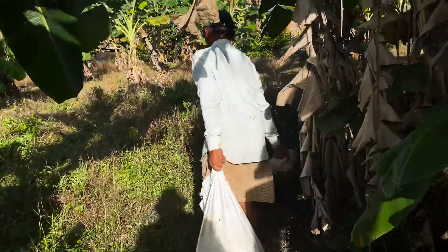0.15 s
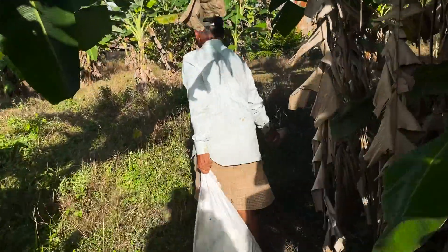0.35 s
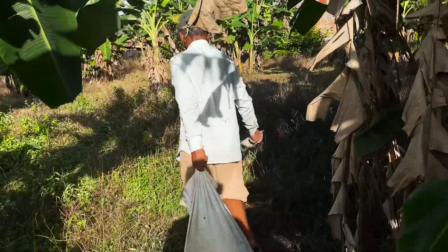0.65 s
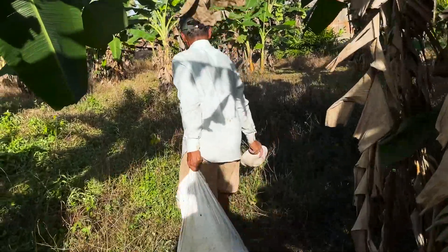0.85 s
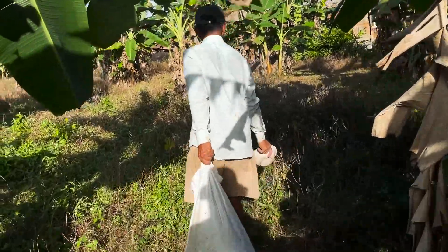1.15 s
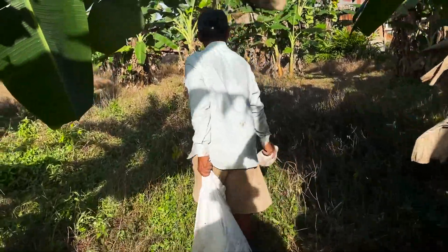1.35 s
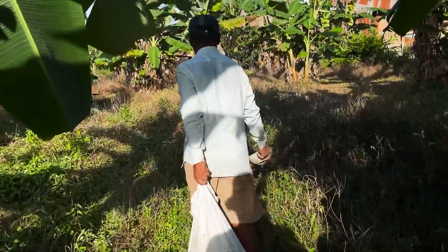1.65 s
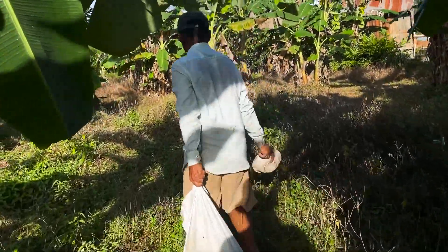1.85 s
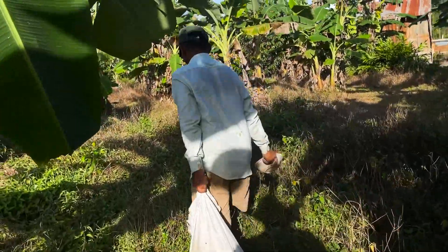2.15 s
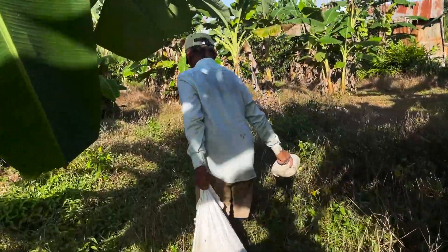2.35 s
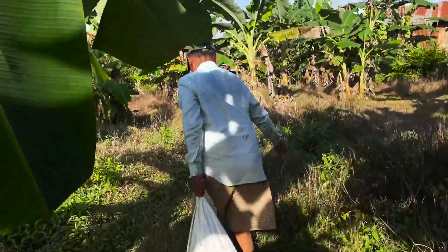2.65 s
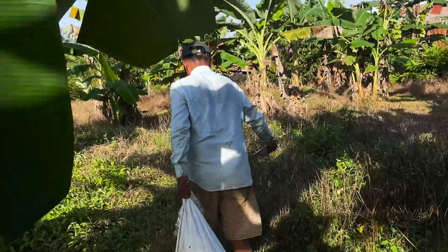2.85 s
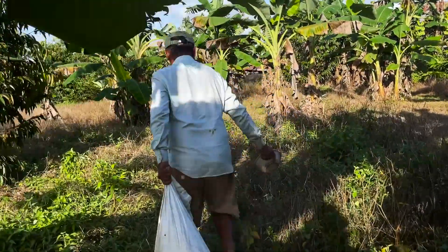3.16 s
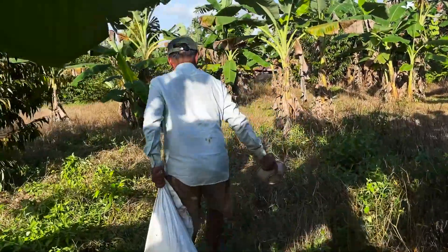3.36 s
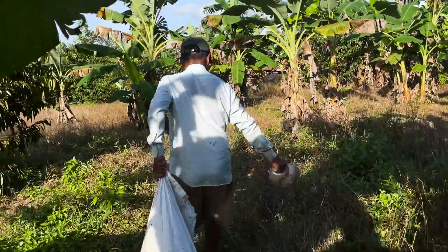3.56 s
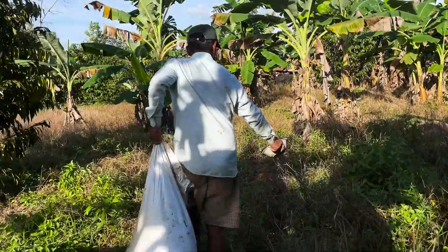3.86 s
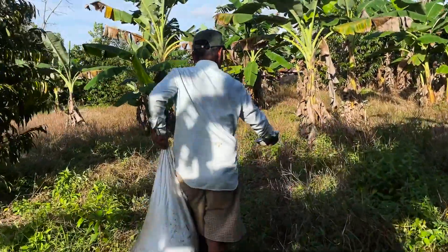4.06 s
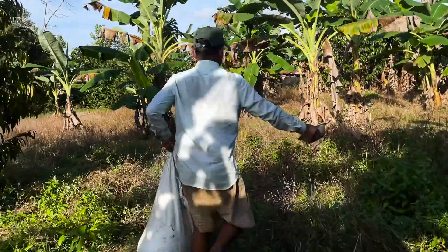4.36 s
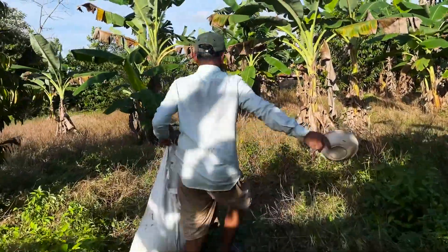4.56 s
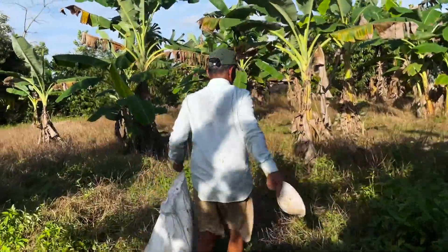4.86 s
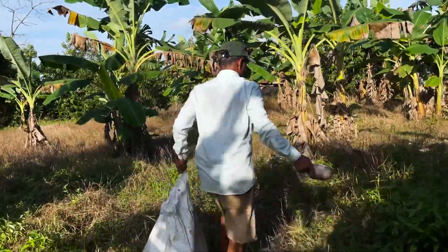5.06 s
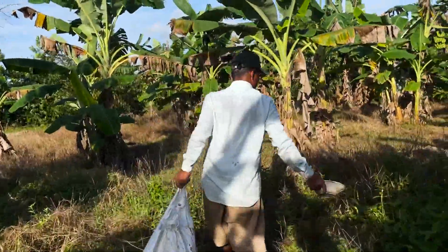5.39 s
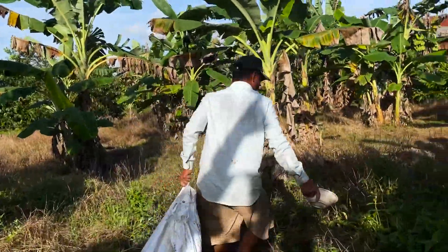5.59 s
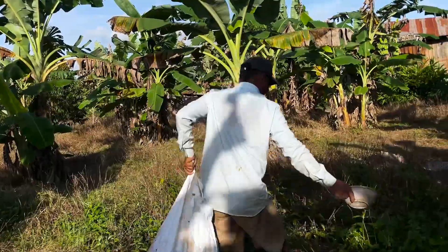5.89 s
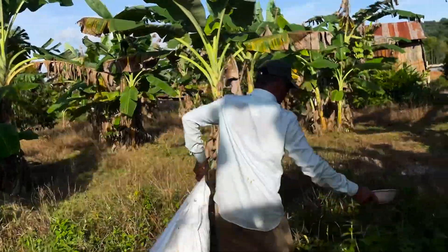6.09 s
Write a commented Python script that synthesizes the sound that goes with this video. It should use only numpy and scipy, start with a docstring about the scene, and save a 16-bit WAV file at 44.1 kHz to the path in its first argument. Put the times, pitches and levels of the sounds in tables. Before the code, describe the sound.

Close outdoor stereo pickup of uneven steps through matted dead grass. Blades hiss, stalks crunch and hollow stems crack, densest in the opening second, then thinning to gentler swishes with scattered bright straw ticks. A sack drags faintly between strokes. Low wind rumble swells in the middle with a few thumping puffs on the microphone; thin insect whines are barely audible over the field's quiet, dry air without any room echo.

```python
"""Dry grass is crushed, stalks crunch and blades hiss in uneven strokes as a man walks through with a sack.
Random tiny contacts, filtered in clumps, make the grass and the dry leaves that sweep past.
Short noise bursts and damped rings make the thudding feet, cracking stems and snapping straws.
Filtered noise and brief low waves make wind rumbling on the microphone and buffeting it.
Narrow noise makes faint insect calls, over the quiet hiss of the field."""
import sys
import numpy as np
from scipy import signal
from scipy.fft import rfft, irfft, next_fast_len
from scipy.io import wavfile

SR = 44100
rng = np.random.default_rng(int(sys.argv[2]) if len(sys.argv) > 2 else 0)


def master(y):
    """Save y as 16-bit WAV."""
    cut = np.clip(np.atleast_2d(y).T, -1, 1)
    pcm = np.round(cut * 32767)  # scale
    wavfile.write(sys.argv[1], SR, pcm.astype(np.int16))


N = 274637

TIME = np.arange(N) / SR  # seconds
SIZE = next_fast_len(N + 4096)  # samples in a spectrum, with room for filter tails
HZ = np.maximum(np.arange(SIZE // 2 + 1) * SR / SIZE, 1)


def grass():
    """Feet crush the mat; legs and sack bend the stalks and slide along the blades."""
    # spectra of the three sounds: f/Hz, relative level/dB
    mat_spectrum = [(30, -21), (90, -1.5), (160, -4), (350, -1), (580, -3.5), (780, -1.5), (980, -2),
                    (1200, -15), (2500, -25)]
    stalk_spectrum = [(400, -19), (850, -12), (1100, -5), (1450, -0.5), (1680, -3), (2150, -1.5),
                      (2850, -17), (4500, -11.5), (8000, -39)]
    blade_spectrum = [(1200, -19), (2600, 1), (3900, 0.5), (5200, 2.5), (6600, 0), (9000, 2), (11500, 0),
                      (14500, -2.5), (15600, -14.5)]
    crush, crunch, hiss = pressure()
    mat = rustle(mat_spectrum, per_s=1100, spread_db=2.0, broad=0.54, clump_db=1.5, patchy_db=1.36)
    stalks = rustle(stalk_spectrum, per_s=1500, spread_db=-0.5, broad=0.85, clump_db=0.52, patchy_db=1.5)
    stems = stem_scrapes(low_hz=1250, high_hz=6000, cycles=30, decay_s=0.005, spread_db=12, tilt_db=-2.2)
    crackle = splinters(per_s=120, spread_db=6)
    blades = rustle(blade_spectrum, per_s=6000, spread_db=3.0, broad=0.63, clump_db=1.17, patchy_db=2.5)
    bending = stalks * from_db(0.24) + from_db(-5) * stems + from_db(-6.5) * crackle
    return crush * mat * from_db(-0.22) + crunch * bending + hiss * blades * from_db(1.5)


def pressure():
    """Gains of crush, crunch and hiss: every stroke bends the grass and lets it go, over the drag of the sack."""
    # a leg or the sack pushes through the grass: t/s at the peak, rise/s, fall/s,
    # crush of matted grass/dB, crunch of bent stalks/dB, hiss of sliding blades/dB (relative levels)
    strokes = [(0.01, 0.05, 0.038, -44.5, -48.5, -65), (0.26, 0.13, 0.1, -40.5, -42, -39.5),
               (0.42, 0.079, 0.21, -42, -47, -44.5), (0.69, 0.029, 0.03, -41, -52, -42.5),
               (0.8, 0.089, 0.061, -43.5, -43, -45), (0.93, 0.11, 0.069, -42.5, -48, -45.5),
               (1.10, 0.079, 0.057, -47, -48, -48), (1.33, 0.16, 0.15, -46, -48, -49.5),
               (1.91, 0.15, 0.085, -44.5, -46.5, -51), (2.37, 0.38, 0.3, -48.5, -51.5, -53),
               (2.58, 0.096, 0.06, -43, -48, -47), (2.78, 0.14, 0.12, -45, -47.5, -50),
               (2.99, 0.056, 0.079, -47.5, -48, -49.5), (3.11, 0.033, 0.086, -45.5, -47.5, -48),
               (3.255, 0.081, 0.044, -42.5, -48, -53), (3.39, 0.06, 0.073, -46.5, -49.5, -50.5),
               (3.59, 0.043, 0.044, -51, -50.5, -56), (3.8, 0.13, 0.065, -73, -50, -52.5),
               (3.98, 0.1, 0.15, -50.5, -57.5, -52.5), (4.291, 0.1, 0.042, -51, -49.5, -43.5),
               (4.37, 0.044, 0.035, -48, -46.5, -40.5), (4.5, 0.13, 0.12, -63, -60.5, -53.5),
               (4.85, 0.13, 0.038, -47.5, -50, -48.5), (5.07, 0.097, 0.025, -54.5, -56, -56),
               (5.27, 0.023, 0.035, -53, -55, -56), (5.585, 0.011, 0.24, -67, -55, -52.5),
               (5.81, 0.053, 0.16, -53.5, -52.5, -46), (5.96, 0.07, 0.038, -48, -52.5, -50),
               (6.19, 0.061, 0.042, -62, -50, -45)]
    # the sack trailing between strokes, lifted clear for a moment: t/s, relative level/dB
    drag = [(0, -60), (1.5, -59), (4.6, -58), (4.95, -61), (5.42, -65.5), (5.6, -53), (6.23, -59.5)]
    drag_db, = in_time(drag)
    share_db = np.array([[1.5], [2.24], [2]])  # how much crush, crunch and hiss the sack makes
    power = from_db(drag_db + share_db) ** 2
    for s, rise_s, fall_s, *levels_db in strokes:
        power = power + np.outer(from_db(levels_db), swell(s, rise_s, fall_s)) ** 2
    return np.sqrt(power)


def rustle(spectrum, per_s, spread_db, broad, clump_db, patchy_db):
    """Contacts in clumps: some sound in one octave only, others across all of them; rms 1."""
    clumps = clump_db * drift(11.8)
    wide = broad * grains(per_s, spread_db)
    total = rfft(wide * from_db(clumps), SIZE)
    for octave in range(7, 15):  # centred on 2 ** octave Hz
        band = np.cos(np.pi / 2 * np.clip(np.log2(HZ) - octave, -1, 1))
        contacts = grains(per_s, spread_db) * band_flicker(clumps, patchy_db)
        total = total + rfft(contacts, SIZE) * band
    pair = irfft(total * from_db(over_hz(spectrum)), SIZE)[:, :N]
    return rms_one(stereo(pair))


def band_flicker(clumps, patchy_db):
    """Gain of one octave: the shared clumps and a flutter of its own."""
    return from_db(clumps + patchy_db * drift(12.3))


def grains(per_s, spread_db):
    """Tiny contacts at random moments, as single clicks of either sign and varying size; rms 1."""
    sizes = from_db(spread_db * np.minimum(rng.exponential(1, (2, N)), 5))
    signs = rng.choice([-1, 1], (2, N))
    return rms_one(sizes * signs * (rng.random((2, N)) < per_s / SR))


def stem_scrapes(low_hz, high_hz, cycles, decay_s, spread_db, tilt_db, count=750):
    """Single stems scrape by, each a short rough note at its own pitch, weaker by the octave; rms 1."""
    out = np.zeros(N)
    for when, pitch, size, length in rng.random((count, 4)):
        hz = low_hz * (high_hz / low_hz) ** pitch
        scrape = burst(decay_s * (0.5 + length), size=2048)
        note = ring(scrape, hz, t60=cycles / hz)
        add(out, when * N / SR, note, spread_db * size ** 2 + tilt_db * np.log2(hz / low_hz))
    return rms_one(among_plants(out))


def splinters(per_s, spread_db, count=7):
    """Dry stalks give way one by one in sharp, wide clicks of varying size; rms 1."""
    out = np.zeros(N)
    for hz in np.geomspace(1100, 4500, count):
        sizes = from_db(spread_db * rng.uniform(-0.38, 1, N)) * rng.choice([-1, 1], N)
        clicks = sizes * (rng.random(N) < per_s / count / SR)
        # the tiny offset keeps silence from being exactly zero
        out += rms_one(band_pass(clicks + 1e-18, hz * 0.45, hz * 1.9)) / np.sqrt(hz)
    return rms_one(among_plants(out))


def leaves():
    """Broad dry leaves scrape by in short swells of clumped contacts."""
    # leaves sweeping past: t/s at the peak, rise/s, fall/s, relative level/dB
    sweeps = [(0.249, 0.024, 0.015, -17.5), (0.58, 0.0096, 0.015, -29.5), (0.773, 0.0058, 0.043, -37),
              (1.63, 0.0068, 0.032, -35.5), (4.825, 0.017, 0.04, -38.5)]
    # spectrum of the scrape: f/Hz, relative level/dB
    leaf_spectrum = [(80, -15), (250, -20.5), (520, -1), (800, 4.5), (1500, -2), (2350, -3), (2900, -23),
                     (4000, -10), (7000, -18.5), (15000, -45)]
    contact = sum(from_db(db) * swell(s, rise_s, fall_s) for s, rise_s, fall_s, db in sweeps)
    scrape = rustle(leaf_spectrum, per_s=900, spread_db=2.8, broad=0.8, clump_db=1.2, patchy_db=1.6)
    return contact * from_db(-8.0) * scrape


def treads():
    """The weight rolls onto a foot and packs the dead grass with a dense, dull crunch."""
    # moments of packing: t/s at the peak, spread/s, relative level/dB
    packing = [(0.79, 0.029, -43), (1.4, 0.043, -49.5), (1.904, 0.034, -48.5), (2.06, 0.037, -48),
               (3.264, 0.081, -48), (4.366, 0.019, -51.5)]
    weight = sum(from_db(db) * swell(s, spread_s, spread_s) for s, spread_s, db in packing)
    crunch = band_pass(grains(per_s=500, spread_db=3), low_hz=217, high_hz=520)
    return weight * rms_one(stereo(crunch))


def rasps():
    """Fine ribs on a stiff blade stick and slip along cloth, driving the blade's resonance."""
    # single blades: t/s at the peak, spread/s, relative level/dB, f/Hz, width/Hz
    blade_rasps = [(0.149, 0.0037, -34.5, 5460, 1500), (0.255, 0.02, -33.5, 2640, 1800),
                   (1.268, 0.0087, -44, 2670, 2000), (1.646, 0.019, -42.5, 2180, 805),
                   (2.77, 0.032, -49, 2150, 900), (4.212, 0.017, -42, 1650, 500),
                   (4.66, 0.077, -57, 2090, 300), (5.047, 0.048, -51.5, 2530, 1400)]
    out = np.zeros((2, N))
    slips = grains(per_s=1400, spread_db=3.5)
    for s, spread_s, db, hz, width_hz in blade_rasps:
        resonance = rms_one(band_pass(slips, hz - width_hz / 2, hz + width_hz / 2))
        out += from_db(db) * swell(s, spread_s, spread_s) * resonance
    return stereo(out)


def footfalls():
    """A soft sole on matted ground gives a short dull thud: a noise burst in a damped low ring."""
    # feet landing: t/s, relative peak level/dB
    landings = [(0.496, -32.5), (0.569, -31.5), (1.623, -34.5), (3.517, -37.5), (3.98, -39), (4.131, -35),
                (4.854, -33), (5.206, -40), (5.255, -39.5)]
    thud_hz = 246
    out = np.zeros(N)
    for s, db in landings:
        push = band_pass(burst(decay_s=0.0087), thud_hz * 0.27, thud_hz * 4)
        add(out, s, ring(push, thud_hz, t60=0.021), db)
    return out


def cracks():
    """A thick stem splits fibre by fibre and its hollow rings briefly; low-pitched stems take longer."""
    # stems cracking: t/s, relative peak level/dB, f/Hz, ring of the hollow/cycles
    stem_cracks = [(0.143, -23, 3400, 3), (0.237, -19, 1400, 4), (0.247, -18, 950, 5),
                   (0.261, -19, 2200, 5), (0.571, -21, 1400, 4), (0.659, -21.5, 2300, 2),
                   (0.77, -23, 1400, 4), (0.776, -22, 1210, 5), (0.793, -25, 850, 5),
                   (0.817, -24.5, 1500, 4), (0.824, -25, 900, 4), (0.841, -25.5, 2150, 5),
                   (0.969, -28, 1050, 7), (1.142, -31, 2800, 7), (1.248, -23, 1900, 3),
                   (1.253, -29, 3200, 12), (1.332, -31, 1850, 10), (1.622, -24.5, 2000, 2),
                   (1.625, -27, 800, 5), (1.639, -27.5, 3000, 2), (2.14, -29.5, 1400, 3),
                   (2.215, -28, 1000, 4), (2.609, -30, 1850, 8), (2.964, -31, 950, 3),
                   (3.094, -32, 1250, 4), (4.215, -28, 4300, 4), (4.377, -29, 2200, 4),
                   (4.814, -30, 1420, 16), (4.845, -29, 800, 4), (5.044, -33, 2350, 8),
                   (5.097, -35, 2500, 3), (5.206, -34.5, 850, 3), (5.207, -29.5, 2400, 2),
                   (5.327, -39.5, 3700, 12), (5.361, -38.5, 4200, 6), (5.398, -36.5, 1400, 3),
                   (5.58, -31, 1500, 2), (5.592, -31, 1220, 3), (5.975, -30, 2800, 3),
                   (6.045, -33, 3200, 8), (6.147, -28.5, 1550, 5), (6.192, -26, 1400, 12)]
    split_cycles = 5  # decay of the split, in cycles of the stem's pitch
    edge_db = 0.5  # splitting fibres against a ring of one cycle; a longer ring outweighs them
    spray_db = -2  # bright spray of the finest fibres, against the split
    out = np.zeros(N)
    age = TIME[:4096]
    for s, db, hz, cycles in stem_cracks:
        fibres = rng.choice([-1, 1], age.size) * (rng.random(age.size) < 0.25)
        split = fibres * np.exp(-age * hz / split_cycles)
        body = rms_one(ring(split, hz, t60=cycles / hz))
        edge = rms_one(band_pass(split, hz * 0.5, hz * 2.6)) + from_db(spray_db) * rms_one(split)
        add(out, s, body + from_db(edge_db) * edge / np.sqrt(cycles), db)
    return out


def snaps():
    """A thin straw gives a bright tick and a faint splintering; lesser ones break where the blades slide."""
    # dry straws snapping: t/s, relative peak level/dB
    straw_snaps = [(0.689, -29), (0.771, -19.5), (1.9755, -34), (2.0265, -33), (2.0916, -35), (2.139, -38),
                   (2.486, -33.5), (2.971, -28), (3.4603, -33.5), (3.943, -36), (4.356, -31), (5.068, -41),
                   (5.087, -42), (5.2172, -31), (5.36, -39.5), (5.378, -42), (6.19, -28)]
    # spectrum of a snap: f/Hz, relative level/dB
    straw_spectrum = [(500, -36), (1500, -19), (4000, -9), (7000, 0), (11000, 3.5), (16000, -1)]
    out = np.zeros(N)
    for s, db in straw_snaps:
        tick = burst(decay_s=0.0014)
        splintering = burst(decay_s=0.009)
        add(out, s, tick + 0.27 * splintering, db + 7.5)
    _, _, hiss = pressure()
    breaks = grains(per_s=37, spread_db=-0.5)[0]
    lesser = rms_one(signal.fftconvolve(breaks, burst(decay_s=0.00092))[:N])
    return coloured(out + hiss * from_db(-5.5) * lesser, from_db(over_hz(straw_spectrum)))


def among_plants(x):
    """A sharp sound arrives directly and scattered by the leaves around, as a short noisy tail."""
    scatter = burst(decay_s=0.0064)
    scattered = signal.fftconvolve(x, scatter / np.linalg.norm(scatter))[:N]
    return stereo(np.array([x, scattered]))


def over_ground(x):
    """A dull ground reflection follows the direct sound; the grass soaks up the reflection's treble."""
    delay_s, echo_db, cut_hz = 0.00089, -16, 2680
    echo = from_db(echo_db) / (1 + (HZ / cut_hz) ** 10)
    return coloured(x, 1 + echo * np.exp(-2j * np.pi * HZ * delay_s))


def wind():
    """Lumpy rumble on the microphone, and single eddies that push its diaphragm to and fro."""
    # rumble: t/s, relative level/dB
    rumble = [(0.0, -57), (0.48, -52.5), (0.61, -56.5), (2.2, -57.5), (2.58, -50), (2.95, -62),
              (3.43, -55.5), (3.78, -59), (4.7, -60), (6.23, -55)]
    # spectrum of the rumble: f/Hz, relative level/dB
    rumble_spectrum = [(15, -31), (32, -26), (48, -1.5), (80, 1.5), (125, -3.5), (200, -8.5), (400, -11),
                       (1000, -44)]
    # puffs hitting the microphone: t/s at the peak, peak level/dB, f/Hz, spread/s
    puffs = [(0.382, -38.5, 51.8, 0.01), (2.495, -28.5, 61.8, 0.0043), (2.566, -31.5, 70, 0.0073),
             (2.596, -31, 135, 0.0071), (2.61, -27, 80, 0.0052), (4.876, -46, 52, 0.034)]
    gain_db, lumps_db, lumps_hz = 3, 1.1, 21  # overall gain; depth and bandwidth of the lumps
    rumble_db, = in_time(rumble)
    eddies = np.zeros(N)
    for s, db, hz, spread_s in puffs:
        wave = np.sin(2 * np.pi * (hz * TIME + rng.random()))
        eddies += from_db(db) * swell(s, spread_s, spread_s) * wave
    level = from_db(rumble_db + gain_db + lumps_db * drift(lumps_hz))
    return air(rumble_spectrum) * level + eddies


def insects():
    """Each call from the field is a thin, wavering whine of narrow noise that starts, holds and stops."""
    # calls: t/s at the middle, length/s, level/dB, f/Hz, half-width/Hz
    calls = [(1.587, 0.35, -61, 5520, 40), (2.27, .24, -62, 5500, 40), (4.766, .27, -55, 3730, 70)]
    out = 0
    for s, length, db, hz, half_width_hz in calls:
        envelope = 1 / (1 + (2 * (TIME - s) / length) ** 10)
        resonance = 1 / (1 + ((HZ - hz) / half_width_hz) ** 2)
        whine = rms_one(coloured(rng.standard_normal((2, N)), resonance))
        out = out + from_db(db + drift(13)) * envelope * whine
    return out


def field():
    """The quiet of the field: steady soft noise."""
    # spectrum: f/Hz, relative level/dB
    field_spectrum = [(100, 3), (400, 13), (900, 12), (2200, 4.5), (3500, 3), (5500, -0.5), (15000, -9)]
    return from_db(-57.0) * air(field_spectrum)


def air(spectrum):
    """Steady stereo noise with a given spectrum, rms 1."""
    noise = rng.standard_normal((2, N))
    return rms_one(stereo(coloured(noise, from_db(over_hz(spectrum)))))


def stereo(pair):
    """Make left and right from a direct and a scattered part; scattering is strongest in the middle range."""
    # likeness of the two channels: f/Hz, likeness (0 to 1)
    likeness = [(60, 0.91), (300, 0.98), (620, 0.81), (1000, 0.93), (2100, 0.59), (5400, 0.57), (7000, 1),
                (8100, 1), (9500, 0.93), (11500, 1)]
    alike = np.clip(over_hz(likeness), 0, 0.999)
    mid, side = coloured(pair, np.sqrt([(1 + alike) / 2, (1 - alike) / 2]))
    return np.array([mid + side, mid - side])


def burst(decay_s, size=6000):
    """A fracture: noise that starts at once and dies away."""
    return rng.standard_normal(size) * np.exp(-np.arange(size) / (SR * decay_s))


def ring(x, hz, t60):
    """One damped resonance, which loses 60 dB in t60 seconds."""
    r = from_db(-60 / (t60 * SR))
    w = 2 * np.pi * hz / SR
    return signal.lfilter([0, np.sin(w)], [1, -2 * r * np.cos(w), r * r], x)


def swell(s, rise_s, fall_s):
    """A smooth bell-shaped rise to 1 at time s, and a smooth fall."""
    spread_s = np.where(TIME < s, rise_s, fall_s)
    return np.exp(-0.5 * np.minimum(((TIME - s) / spread_s) ** 2, 100))


def drift(rate):
    """Smooth random wandering with rms 1: slow low-passed noise, drawn every 40 samples."""
    r = np.exp(-80 * np.pi * rate / SR)  # rate is the bandwidth in Hz
    noise = rng.standard_normal(N // 40 + 2002)
    slow = signal.lfilter([1], [1, -2 * r, r * r], noise)[2000:]  # skip the filter's start
    return np.interp(np.arange(N) / 40, np.arange(len(slow)), rms_one(slow))


def band_pass(x, low_hz, high_hz):
    """Keep one band of frequencies, working forward in time only."""
    edges = np.clip([low_hz, high_hz], 20, 0.45 * SR)
    return signal.sosfilt(signal.butter(2, edges, "band", fs=SR, output="sos"), x)


def coloured(x, gain):
    """Filter a sound by a gain per frequency."""
    return irfft(rfft(x, SIZE) * gain, SIZE)[..., :N]


def add(track, s, sound, peak_db):
    """Lay a short sound into a track at its time and peak level."""
    start = int(np.clip(s * SR, 0, N - 1))
    scaled = from_db(peak_db) * sound / np.abs(sound).max()
    track[start:start + len(sound)] += scaled[:N - start]


def in_time(rows):
    """Read the columns of a curve at every sample, with straight lines between its points."""
    s, *columns = np.transpose(rows)
    return [np.interp(TIME, s, c) for c in columns]


def over_hz(points):
    """Read a table at every frequency, with straight lines on a log-frequency axis."""
    hz, value = np.transpose(points)
    return np.interp(np.log(HZ), np.log(hz), value)


def from_db(db):
    """Turn decibels into a gain."""
    return 10 ** (np.asarray(db) / 20)


def rms_one(x):
    """Scale a sound to an rms level of 1."""
    return x / np.sqrt(np.mean(x ** 2) + 1e-20)


def scene():
    """The walk with its ground reflection, the wind, the insects and the quiet of the field."""
    sharp = among_plants(footfalls() + cracks() + snaps())
    walk = grass() + leaves() + treads() + rasps() + sharp
    return over_ground(walk) + wind() + insects() + field()


def record(dry):
    """Each microphone port has its own colour, the left mostly lags in the treble, and the top is cut."""
    # colour of the two ports: f/Hz, left minus right/dB
    ports = [(330, 1), (750, -1), (1250, 0.6), (2250, -1.5), (3200, 2.5), (4500, 0.5), (6600, 3),
             (7900, -0.5)]
    # lag of the left behind the right: f/Hz, phase/radians
    phase_lag = [(0, 0), (4600, 0), (5300, -.7), (7000, 1.4), (8150, 3.14), (11500, 6.28), (14800, 9.42),
                 (16000, 9.6)]
    cutoff_hz = 15800
    sides = np.array([[0.5], [-0.5]])  # each channel takes half the difference
    lag = np.interp(HZ, *np.transpose(phase_lag))
    low_pass = 1 / np.sqrt(1 + (HZ / cutoff_hz) ** 160)
    colour = from_db(sides * over_hz(ports))
    return coloured(dry, low_pass * colour * np.exp(-1j * lag * sides))


dry = scene()
out = record(dry)
master(out)
```